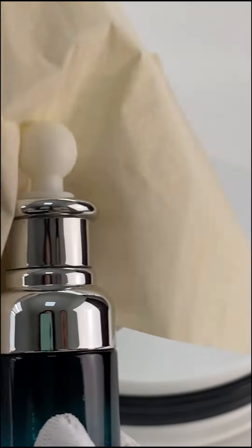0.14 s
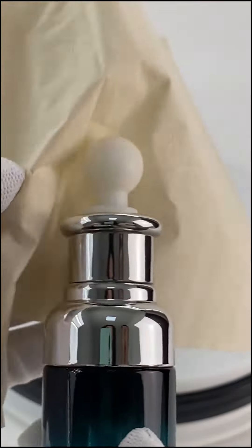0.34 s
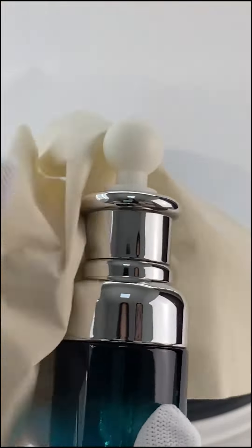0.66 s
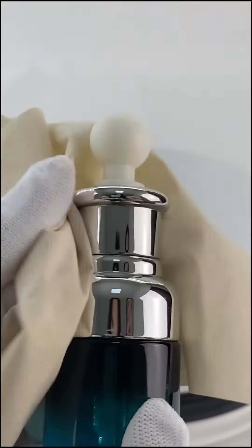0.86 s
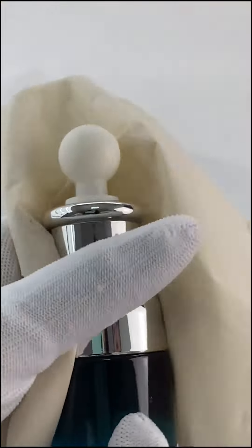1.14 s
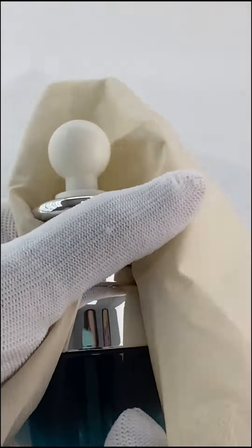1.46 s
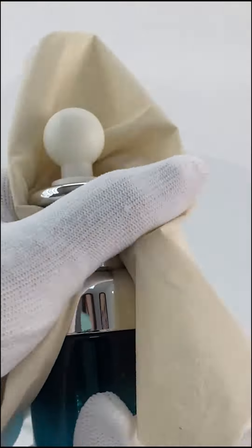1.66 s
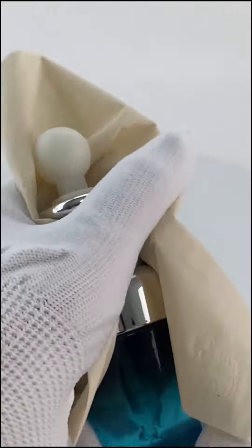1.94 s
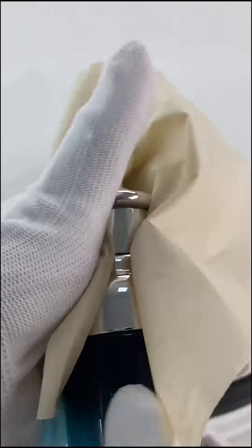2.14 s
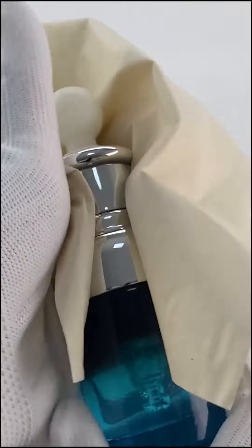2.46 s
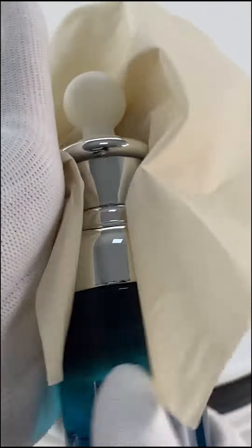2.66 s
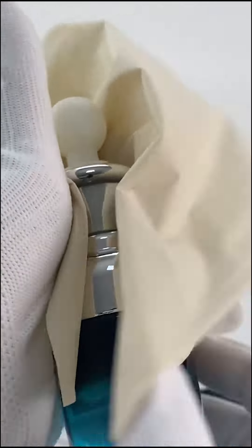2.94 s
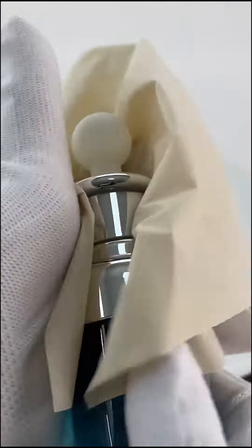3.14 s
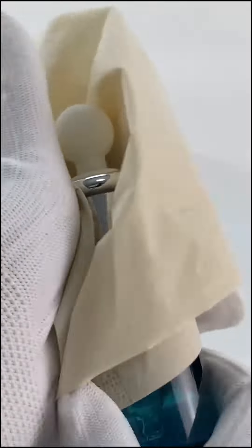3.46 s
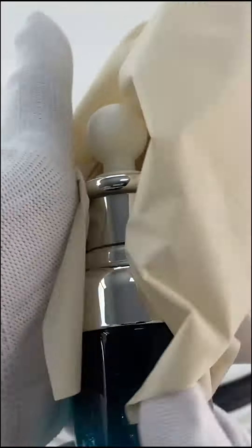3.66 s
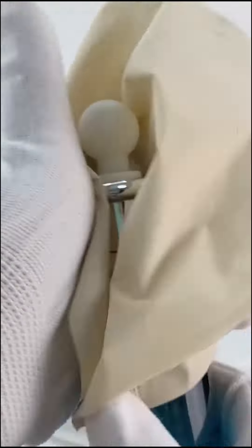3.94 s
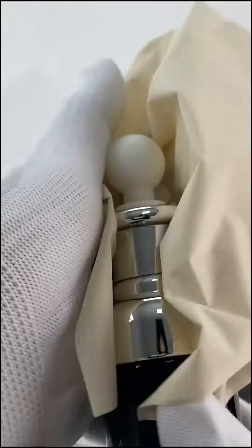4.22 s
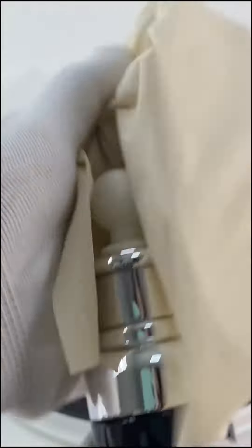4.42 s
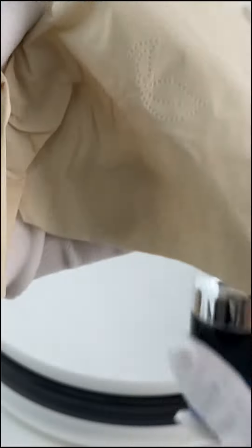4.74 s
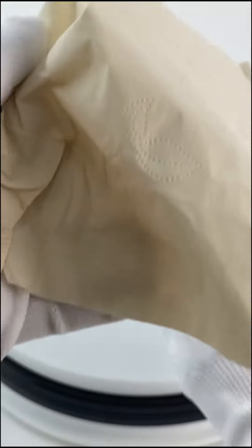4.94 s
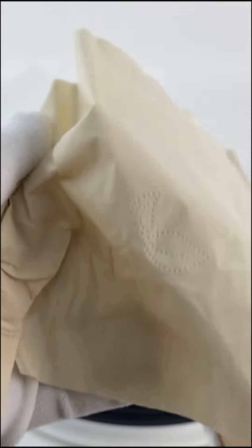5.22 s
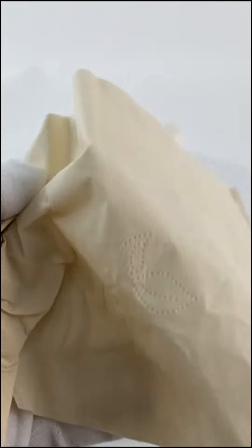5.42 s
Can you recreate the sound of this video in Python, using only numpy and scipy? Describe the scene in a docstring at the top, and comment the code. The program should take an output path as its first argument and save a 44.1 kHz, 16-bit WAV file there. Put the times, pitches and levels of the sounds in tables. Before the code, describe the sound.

A quiet, slightly reverberant room with a steady, faint low hum and soft dark air rush, heard close in stereo. From the start, gloved hands rub a thin tissue on a glass bottle: a brief brush at 0.1 s, gentler strokes, then the strongest airy swish at about 0.9-1.0 s. Small dry crease ticks appear from 0.3 s and cluster at 1.25-1.5 s, with a sharper one at 1.7 s. Soft irregular strokes continue several times a second, with dull glove rub beneath the papery hiss and only occasional ticks. Rubs are a bit firmer near 3.5, 3.8 and 4.25 s; a last pull at 4.45 s removes the tissue, leaving barely audible rustle. At 5.36 s the bottle hits the table: a loud, hollow, mid-low knock with a short glassy tick and ringing tail. Around 5.53 s a softer, muffled knock follows as the base grinds briefly and settles.

```python
"""A quiet room with a low hum: gloved hands wipe a glass bottle with a tissue, close up.
Every stroke hisses (noise and tiny clicks, driven by sliding speed) and creases tick (filtered clicks).
The tissue is pulled off and the bottle set down on a table: a loud knock, then a softer one as it
settles (damped resonances, ringing modes, a reverberant tail), its base grinding in between.
Steady sines and coloured noise make the room."""
import sys
import numpy as np
from scipy import signal
from scipy.fft import rfft, irfft, next_fast_len
from scipy.io import wavfile

SR = 44100
rng = np.random.default_rng(int(sys.argv[2]) if len(sys.argv) > 2 else 0)


def wav_out(sig):
    """Save sig, one row per channel (or a flat mono array), as 16-bit PCM at SR to the path in sys.argv[1]."""
    wavfile.write(sys.argv[1], SR, np.round(np.clip(np.atleast_2d(sig).T, -1, 1) * 32767).astype(np.int16))


N = 246078

# Spectra of the fine fibres, the folded sheet and the dull glove rub.
# Each row: frequency in Hz, relative density in dB per Hz.
FIBRE_SPECTRUM = [(1000, -6.5), (2000, -5), (3500, 0), (5000, 0), (7000, 0), (9000, 2), (12000, -4.5),
                  (16000, -4)]
FOLD_SPECTRUM = [(1200, -19), (1900, -8), (2700, -3), (3300, -7), (4200, -24), (7000, -36.5)]
GLOVE_SPECTRUM = [(100, -6.5), (300, 7), (500, 2.5), (800, -2.5), (1300, -1.5), (1800, -8), (2800, -38),
                  (6000, -74)]
# Pressure of the glove. Each row: time in seconds, dull rub against hiss in dB.
GRIP_CURVE = [(.08, 6), (.3, -3), (.62, 5), (.96, -3), (1.42, 4.5), (1.9, -4), (2.75, -0.5), (3.05, -6),
              (3.3, 3), (3.45, -6), (4.0, -1), (4.27, -1.5), (4.41, 0), (4.465, 6), (4.56, -3)]
SHEEN_HZ, SHEEN_LOSS_DB_PER_GRIP_DB = 9000, 0.26


def tissue():
    """Tissue slides on glass under the glove; pressing harder gives more dull rub and less sheen."""
    hiss_gain, fold_gain = wiping()
    grip = in_time(GRIP_CURVE)
    fibres = from_db(3.5) * friction(FIBRE_SPECTRUM, slips_per_s=5500, spread_db=4.0,
                                     smooth_share=0.93, flutter_db=1.1)
    high_pass = signal.butter(4, SHEEN_HZ, "high", fs=SR, output="sos")
    sheen = signal.sosfiltfilt(high_pass, fibres)
    sheen_gain = from_db(-1.0) * grip ** -SHEEN_LOSS_DB_PER_GRIP_DB
    fibres = hiss_gain * (fibres + sheen * (sheen_gain - 1))
    sheet = fold_gain * from_db(-1.5) * friction(FOLD_SPECTRUM, slips_per_s=1200, spread_db=4.0,
                                                 smooth_share=0.73, flutter_db=2.0)
    glove = hiss_gain * grip * friction(GLOVE_SPECTRUM, slips_per_s=1200, spread_db=3.5,
                                        smooth_share=0.54, flutter_db=1.0)
    wrinkles = from_db(-6.5) * hiss_gain * crinkle()
    return fibres + sheet + wrinkles + glove * pan(3.4)


# Rubs over the glass. Each row: fastest moment in seconds, speeding up in seconds,
# slowing down in seconds, hiss level in dB, folds against hiss in dB.
STROKE_LIST = [(.085, 0.028, 0.075, -59, 2.5), (.25, 0.2, 0.095, -65.5, 1), (.66, 0.13, 0.13, -63, 1),
               (.765, 0.072, 0.04, -61, 3), (.91, 0.052, 0.061, -56.5, -4), (.96, 0.055, 0.088, -52, 1.5),
               (1.13, 0.16, 0.11, -58, 3.5), (1.26, 0.12, 0.11, -65.5, 7), (1.45, 0.14, 0.026, -64, 2),
               (1.53, 0.061, 0.2, -69, -4), (1.7, 0.068, 0.22, -63.5, -0.5),
               (1.922, 0.057, 0.076, -62.5, 6), (2.09, 0.15, .14, -65, 3), (2.27, 0.13, 0.06, -64, -4),
               (2.41, 0.1, .24, -65.5, -2), (2.58, 0.056, 0.064, -71.5, 8.5),
               (2.805, 0.092, 0.049, -62.5, -4), (3.025, .13, 0.089, -64, 0.5),
               (3.27, 0.21, .08, -62, -0.5), (3.468, .08, 0.064, -59.5, -0.5), (3.64, .13, .1, -63, 2.5),
               (3.785, 0.087, 0.089, -56.5, -7.5), (3.99, 0.057, .03, -59.5, -2.5),
               (4.045, 0.026, 0.032, -64, 2), (4.145, .045, 0.067, -65.5, 4.5),
               (4.245, 0.075, 0.17, -60.5, -1), (4.465, 0.083, 0.067, -57, 0),
               (4.585, 0.033, 0.12, -69.5, -11)]
# The tissue never lies still: round the bottle, then loose in the hand.
# Each row: time in seconds, hiss level in dB.
RESTING_CURVE = [(0, -68), (.5, -72), (1.7, -69), (2.3, -76.5), (2.9, -70), (3.9, -68.5), (4.5, -68.5),
                 (4.86, -78.5), (5.0, -75), (5.25, -80.5)]


def wiping():
    """Gains of hiss and folds: strokes add in power over the resting rustle."""
    resting_power = in_time(RESTING_CURVE) ** 2
    hiss_power, folds_power = resting_power, resting_power
    for peak_s, rise_s, fall_s, hiss_db, folds_db in STROKE_LIST:
        power = (from_db(hiss_db) * sliding(peak_s, rise_s, fall_s)) ** 2
        hiss_power = hiss_power + power
        folds_power = folds_power + power * from_db(folds_db) ** 2
    return np.sqrt(hiss_power), np.sqrt(folds_power)


SPEED_POWER = 0.65  # exponent: friction amplitude against sliding speed


def sliding(peak_s, rise_s, fall_s):
    """Friction gain, top 1, as the hand speeds up smoothly and slows down again."""
    t = np.arange(N) / SR - peak_s
    phase = np.clip(np.where(t < 0, t / rise_s, t / fall_s), -1, 1)
    speed = .5 + .5 * np.cos(np.pi * phase)
    return speed ** SPEED_POWER


# Stereo width of friction. Each row: frequency in Hz, side against mid in dB.
FRICTION_WIDTH = [(150, -9), (400, -8), (850, -14), (1500, -5.5), (2000, -21), (2400, -57), (2800, -53),
                  (3300, -32), (3700, -59), (6800, -46), (8500, -34)]


def friction(spectrum, slips_per_s, spread_db, smooth_share, flutter_db):
    """Surfaces catch and slip: random clicks of uneven size over smooth, fluttering noise; rms 1."""
    sizes = from_db(spread_db * np.minimum(rng.exponential(1, N), 4)) * rng.choice([-1, 1], N)
    slips = rms_one(sizes * (rng.random(N) < slips_per_s / SR))
    grain = rms_one(slips + smooth_share * rng.standard_normal(N))
    stereo = widen(grain, rng.standard_normal(N), FRICTION_WIDTH)
    return colour(stereo * from_db(flutter_db * drift(56)), spectrum)


def crinkle(per_s=110, low_hz=2000, high_hz=8000):
    """Single fibres or tiny wrinkles snap at random times: band-passed clicks; rms 1."""
    clicks = rng.choice([-1, 1], N) * (rng.random(N) < per_s / SR)
    return rms_one(band(clicks + 1e-18, low_hz, high_hz))


# Creases snapping. Each row: start in seconds, level in dB, centre frequency of the fold in Hz,
# gain of the bright snap in dB.
CREASE_LIST = [(.329, -41, 1200, -2.5), (.406, -39.5, 2230, -6), (0.8084, -39, 2040, -12),
               (0.843, -45, 2170, -4), (0.905, -36.5, 1500, -3), (1.259, -36, 2700, -22),
               (1.269, -41, 2620, -3), (1.29, -39, 1480, 2.5), (1.323, -40.5, 2420, -1.5),
               (1.374, -40.5, 1600, -1), (1.4396, -40, 2400, -2), (1.451, -41, 1270, 1),
               (1.4568, -44.5, 1090, 5.5), (1.464, -41.5, 1400, 5), (1.4971, -39, 1260, -1),
               (1.5055, -40, 3550, -3), (1.5138, -43.5, 2400, 5), (1.7287, -34, 2620, -20),
               (2.029, -43.5, 1300, -4), (2.079, -38.5, 2470, -14), (2.3551, -43, 2900, 0),
               (2.44, -46, 3600, 0), (3.542, -39, 2800, -9), (3.6907, -37, 2800, -11), (4.36, -38, 1500, 3),
               (4.4593, -36.5, 1530, -8), (4.465, -37, 390, -3), (4.702, -43.5, 2230, -9),
               (5.166, -48, 2100, -20)]


def creases(crumple_s=0.00072, crumple_share=0.24, settle_s=0.0039, settle_share=0.12,
            body_db=-2.5, spread=1.56):
    """A crease buckles: a click and brief crumple; the fold gives the pitch and settles more slowly."""
    out, t = np.zeros(N), np.arange(SR // 25) / SR
    for start_s, level_db, centre_hz, bright_db in CREASE_LIST:
        crumple, settle = rng.standard_normal((2, len(t)))
        buckle = (t == 0) + crumple_share * crumple * np.exp(-t / crumple_s)
        snap = band(buckle, 3250, 7560)
        fold = buckle + settle_share * settle * np.exp(-t / settle_s)
        body = band(fold, centre_hz / spread, centre_hz * spread)
        tick = from_db(bright_db) * snap / abs(snap).max() + from_db(body_db) * body / abs(body).max()
        add(out, start_s, from_db(level_db) * tick)
    return out


# The bottle meets the table. Each row: start in seconds, strength in dB, treble gain in dB
# (hardness of the contact).
KNOCK_LIST = [(5.3563, 0, -1), (5.5266, -8, -19)]
# Short clack of the contact. Each row: frequency in Hz, relative density in dB per Hz.
CLACK_SPECTRUM = [(50, -18), (200, 2), (450, -1), (700, 1), (1100, -7), (1400, -10.5), (1900, -17),
                  (3000, -16), (4000, -31), (6000, -28.5), (9000, -30), (16000, -61)]


def bottle(clack_s=0.014):
    """Glass ticks on the table, the top thumps hollow and rings on into the room."""
    out, t = np.zeros((2, N)), np.arange(SR // 2) / SR
    crack = from_db(-28) * band(1. * (t == 0), 1960, 15000)
    body = (blow(t) + crack + table_ring(t)) * pan(1.6)
    low_pass = signal.butter(2, 2400, fs=SR, output="sos")
    for start_s, strength_db, hard_db in KNOCK_LIST:
        clack_noise = diffuse(CLACK_SPECTRUM, ECHO_STEREO, size=len(t))
        clack = from_db(-19.5) * clack_noise * np.exp(-t / clack_s)
        knock = body + (clack + from_db(-30.5) * room_tail(t)) * pan(.6)
        # a soft contact excites less treble
        dull = signal.sosfilt(low_pass, knock)
        add(out, start_s, from_db(strength_db) * (dull + from_db(hard_db) * (knock - dull)))
    return out


# Short resonances, from the bending of the top to the tick of the glass.
# Each row: frequency in Hz, level in dB, time to the peak in seconds, steepness (exponent).
BLOW_RESONANCES = [(253, -19.5, 0.012, 5.3), (300, -17.5, 0.005, 1.2), (472, -4, 0.0052, 4.8),
                   (840, -26, 0.0012, 5.5), (1310, -27, 0.0015, 0.96), (5750, -22, 0.00033, 1.3)]


def blow(t):
    """The impact: heavily damped resonances of table top and glass."""
    return sum(from_db(db) * swell(t, hz, peak_s, steepness)
               for hz, db, peak_s, steepness in BLOW_RESONANCES)


def swell(t, hz, peak_s, steepness):
    """A heavily damped resonance that builds up and dies quickly; envelope top 1."""
    envelope = (t / peak_s * np.exp(1 - t / peak_s)) ** steepness
    return envelope * np.sin(2 * np.pi * hz * t)


# Modes of the table top with the bottle on it.
# Each row: frequency in Hz, level in dB, time to fall by 60 dB in seconds.
TABLE_MODES = [(92, -38.5, 0.51), (149.4, -32, 0.41), (195.6, -30.5, 0.36), (241.4, -30, 1),
               (276, -32, 0.95), (296.5, -35.5, 0.8), (366, -33, 0.73), (366, -48, 0.53), (447, -26, 0.54),
               (461, -25, 0.25), (470.3, -22.5, 0.17), (498, -27.5, 0.93), (523, -34, 0.82),
               (600, -36, 0.18), (690, -26, 0.055), (833, -38, 0.37), (945, -55, 0.22), (1157, -45, 0.17),
               (1094, -46.5, 0.69), (1340, -28, 0.06), (1480, -41, 0.12), (1730, -63, .35),
               (2326, -52, 0.45), (5200, -46, 0.14)]


def table_ring(t, apart_rad=0.2, build_s=0.01):
    """Decaying modes; each reaches the two microphones a little out of step."""
    lead = apart_rad * np.array([[1], [-1]])
    ring = 0
    for k, (hz, db, t60_s) in enumerate(TABLE_MODES):
        sign = (-1) ** k
        ring = ring + sign * from_db(db - 60 * t / t60_s) * np.sin(2 * np.pi * hz * t + lead * sign)
    return ring * (1 - np.exp(-t / build_s))


# The room's answer. Each row: frequency in Hz, relative density in dB per Hz.
ECHO_SPECTRUM = [(40, -21), (80, 0), (130, -8), (250, -12), (470, 5), (680, -10), (1200, -18), (2200, -22),
                 (3800, -30), (5200, -23.5), (8000, -34), (12000, -38), (16000, -42)]
# Stereo width of clack and tail. Each row: frequency in Hz, side against mid in dB.
ECHO_STEREO = [(100, -13), (250, -20), (480, 0.5), (1000, -2), (1700, -3), (2300, -27.5), (3100, -18),
               (3700, -46), (9000, -35)]
# Reverberation. Each row: frequency in Hz, time to fall by 60 dB in seconds.
REVERB_T60 = [(100, 1), (500, 1), (2000, 1), (6000, 0.75), (14000, 0.38)]


def room_tail(t, build_s=0.0042):
    """Diffuse reverberation of one knock: noise in octaves, dying sooner in the treble."""
    noise = rfft(diffuse(ECHO_SPECTRUM, ECHO_STEREO, size=len(t)))
    hz = np.fft.rfftfreq(len(t), 1 / SR)
    tail = 0
    for low_hz in 40 * 2. ** np.arange(10):
        octave = irfft(noise * (hz >= low_hz) * (hz < 2 * low_hz), len(t))
        t60_s = at_hz(REVERB_T60, low_hz * np.sqrt(2))
        tail = tail + octave * from_db(-60 * t / t60_s)
    return tail * (1 - np.exp(-t / build_s))


# The base grinds round before it settles. Each row: time in seconds, level in dB.
ROCKING_CURVE = [(5.47, -65), (5.505, -40), (5.529, -30.5), (5.55, -49), (5.58, -46)]
# Each row: frequency in Hz, relative density in dB per Hz.
GRIND_SPECTRUM = [(200, -29), (500, 15), (750, 1), (1200, -20), (2500, -23), (5000, -48)]


def rocking():
    """The rim of the base grinds on the table around the second knock: stick-slip noise."""
    level_db = np.interp(np.arange(N) / SR, *np.transpose(ROCKING_CURVE), left=-np.inf)
    return from_db(level_db) * friction(GRIND_SPECTRUM, slips_per_s=1000, spread_db=3.0,
                                        smooth_share=.6, flutter_db=1.0)


# Motor hum. Each row: frequency in Hz, mean level in dB.
HUM_TONES = [(26.9, -64), (73.8, -59), (145.5, -68.5), (200.3, -69.5)]
# Rush of the room. Each row: frequency in Hz, relative density in dB per Hz.
AIR_SPECTRUM = [(20, -35), (30, -0.5), (46, -2), (80, 0), (120, -10), (250, -14), (390, -14), (520, -18.5),
                (800, -25.5), (1300, -29.5), (1900, -34.5), (2600, -37), (7000, -47.5), (16000, -54)]
# Stereo width of the rush. Each row: frequency in Hz, side against mid in dB.
AIR_WIDTH = [(70, -18.5), (200, -9.5), (400, -6), (750, 0), (1300, -1.5), (1700, 0), (2100, -23),
             (3200, -28), (3700, -43)]
AIR_LEVEL_DB = -53.5


def room_noise(waver_db=1.0, wander_rad=0.44):
    """A motor hums, its tones wavering in level and phase, over the rush of the room."""
    t = np.arange(N) / SR
    hum = 0
    for hz, db in HUM_TONES:
        gain = np.sqrt(2) * from_db(db + waver_db * drift(0.73))
        hum = hum + gain * np.sin(2 * np.pi * (hz * t + rng.random()) + wander_rad * drift(1))
    return (hum + from_db(AIR_LEVEL_DB) * diffuse(AIR_SPECTRUM, AIR_WIDTH, size=N)) * pan(0.87)


def from_db(db):
    """Decibels to gain."""
    return 10 ** (np.asarray(db) / 20)


def rms_one(x):
    """Scale to rms 1."""
    return x / np.sqrt(np.mean(x ** 2) + 1e-20)


def at_hz(points, hz):
    """Read a table on a log-frequency axis."""
    table_hz, values = np.array(points).T
    return np.interp(np.log(np.maximum(hz, 1)), np.log(table_hz), values)


def in_time(curve):
    """A level curve of seconds and dB as a gain for every sample."""
    return from_db(np.interp(np.arange(N) / SR, *np.transpose(curve)))


def drift(corner_hz):
    """Slow random curve, rms about 1: noise through a two-pole low-pass at SR / 40."""
    pole = np.exp(-80 * np.pi * corner_hz / SR)
    noise = rng.standard_normal(N // 40 + 2002)
    slow = signal.lfilter([1], [1, -2 * pole, pole * pole], noise)[2000:]  # drop the start-up
    return np.interp(np.arange(N) / 40, np.arange(len(slow)), rms_one(slow))


def band(x, low_hz, high_hz):
    """Causal band-pass."""
    sos = signal.butter(2, [low_hz, min(high_hz, .48 * SR)], "band", fs=SR, output="sos")
    return signal.sosfilt(sos, x)


def colour(x, spectrum):
    """Give a sound a spectrum; rms 1."""
    size = next_fast_len(x.shape[-1])
    hz = np.fft.rfftfreq(size, 1 / SR)
    shaped = rfft(x, size) * from_db(at_hz(spectrum, hz)) * (hz > 20)
    return rms_one(irfft(shaped, size)[..., :x.shape[-1]])


def widen(mid, side, width):
    """Left and right from two unrelated sounds, the side weighted by the width table."""
    size = next_fast_len(len(mid))
    side_gain = from_db(at_hz(width, np.fft.rfftfreq(size, 1 / SR)))
    apart = irfft(rfft(side, size) * side_gain, size)[:len(mid)]
    return mid + apart * [[1], [-1]]


def diffuse(spectrum, width, size):
    """Stereo noise of a given spectrum and width; rms 1."""
    mid, side = rng.standard_normal((2, size))
    return colour(widen(mid, side, width), spectrum)


def pan(left_over_right_db):
    """Gains of left and right for a level difference."""
    return from_db([[left_over_right_db / 2], [-left_over_right_db / 2]])


def add(out, start_s, sound):
    """Mix a sound in at a time."""
    start = round(start_s * SR)
    part = sound[..., :N - start]
    out[..., start:start + part.shape[-1]] += part


def scene():
    """Wiping, setting down, and the room."""
    return tissue() + creases() + bottle() + rocking() + room_noise()


# Treble lag of the left channel behind the right.
# Each row: frequency in Hz, lag in turns of phase.
LEFT_LAG_TURNS = [(7400, 0), (7650, .14), (8900, .5), (9200, .5), (10900, 1), (11550, 1), (13000, 1.5),
                  (13600, 1.5), (15000, 2)]
CUTOFF_HZ = 15800


def record(dry):
    """The microphone pair shifts the treble between the channels; a steep low-pass cuts the top."""
    size = next_fast_len(N + SR // 10)
    hz = np.fft.rfftfreq(size, 1 / SR)
    turns = np.interp(hz, *np.transpose(LEFT_LAG_TURNS))
    lag = np.exp(-2j * np.pi * turns * [[1], [0]])
    low_pass = 1 / np.sqrt(1 + (hz / CUTOFF_HZ) ** 200)
    return irfft(rfft(dry, size) * lag * low_pass, size)[:, :N]


dry = scene()
out = record(dry)
wav_out(out)
```